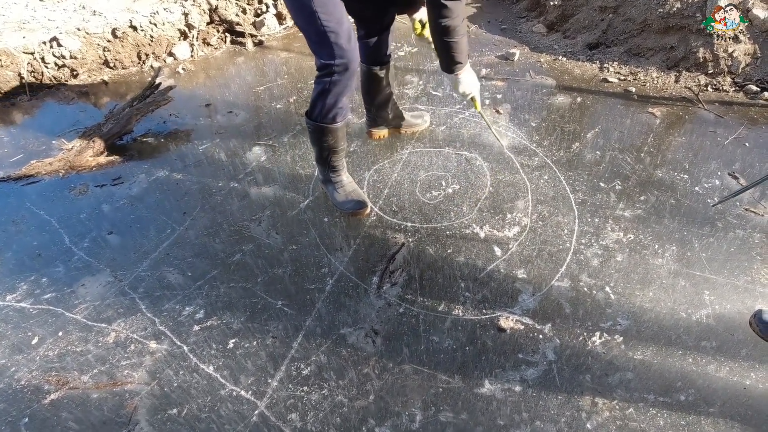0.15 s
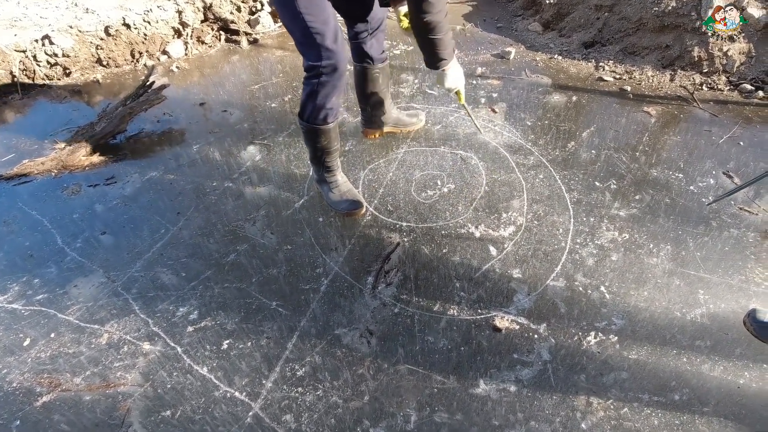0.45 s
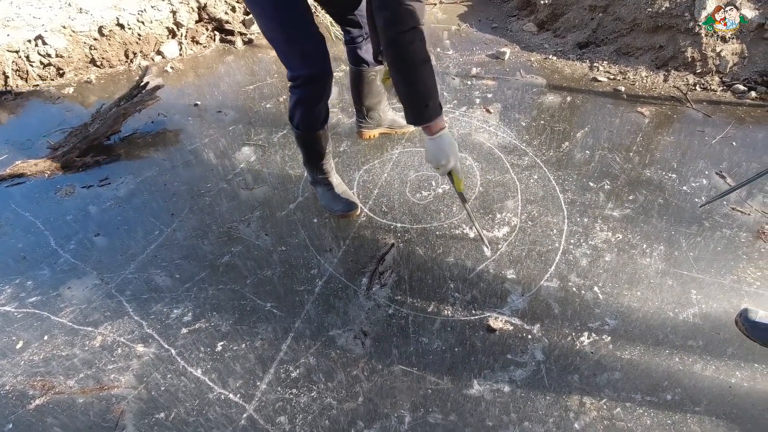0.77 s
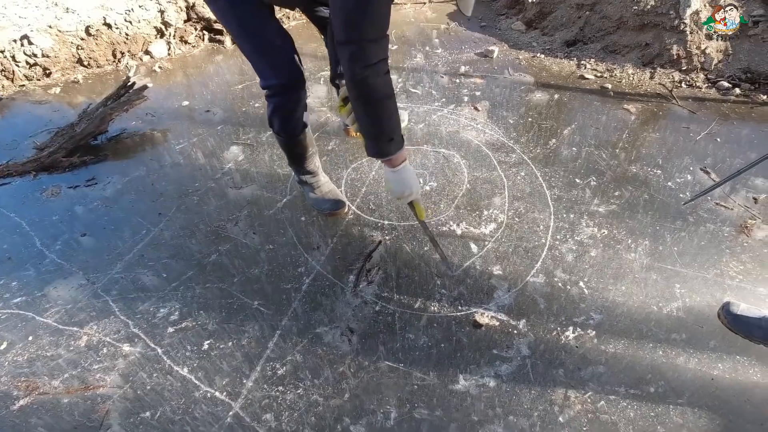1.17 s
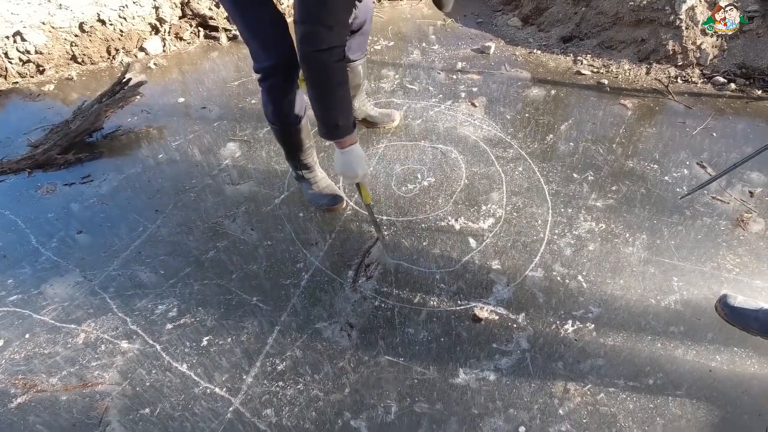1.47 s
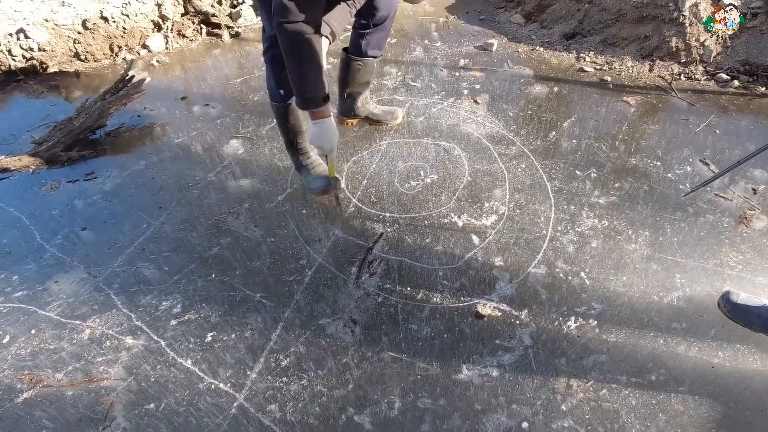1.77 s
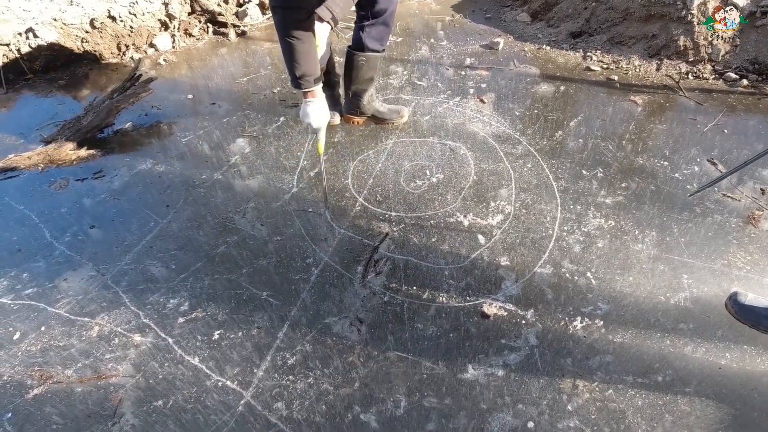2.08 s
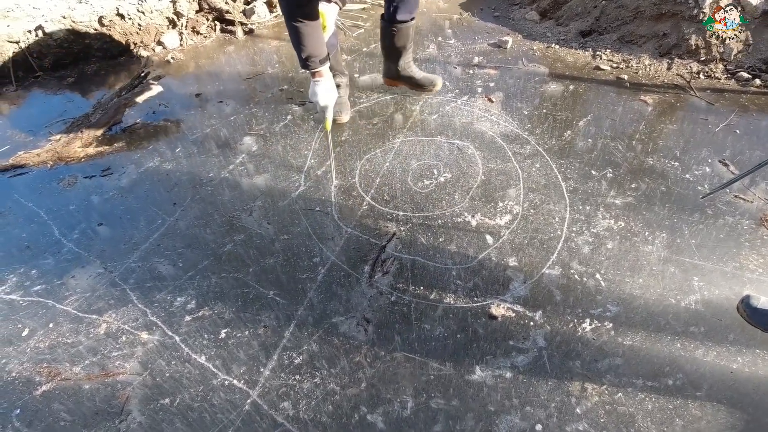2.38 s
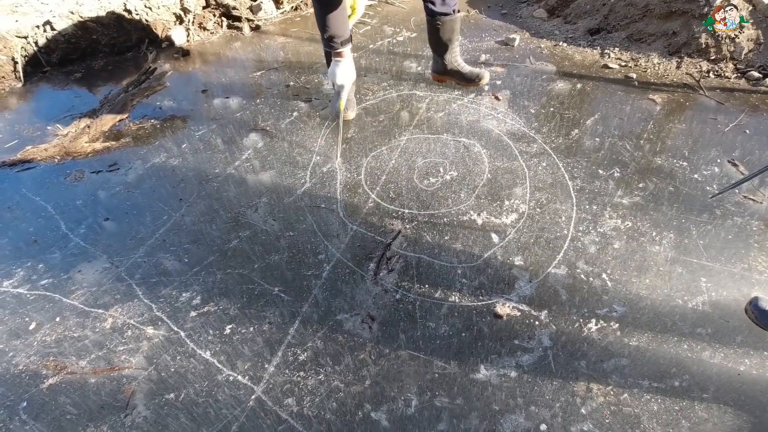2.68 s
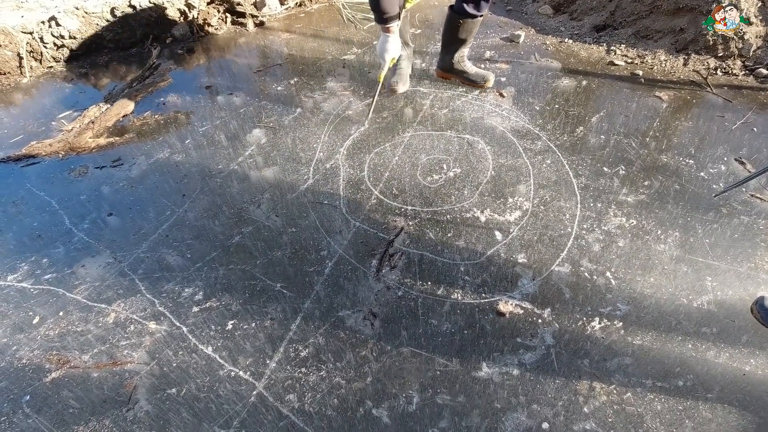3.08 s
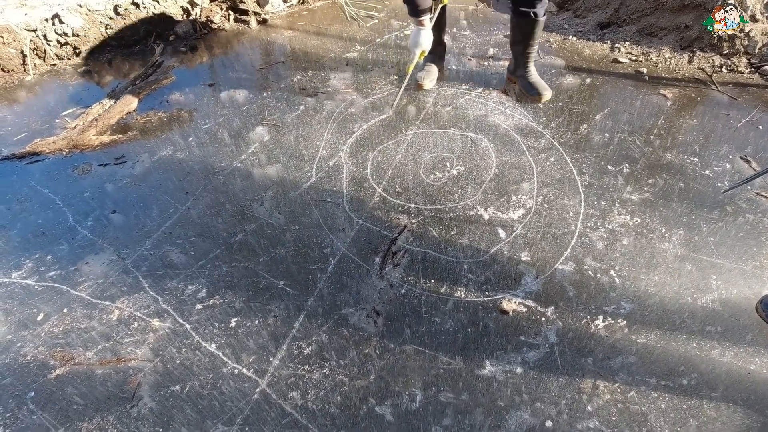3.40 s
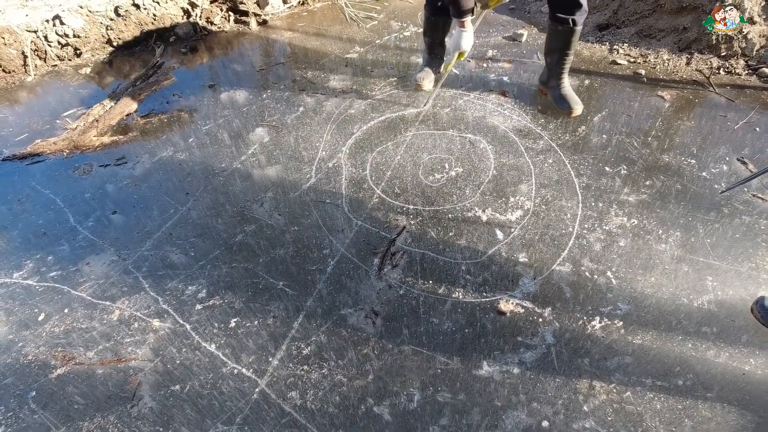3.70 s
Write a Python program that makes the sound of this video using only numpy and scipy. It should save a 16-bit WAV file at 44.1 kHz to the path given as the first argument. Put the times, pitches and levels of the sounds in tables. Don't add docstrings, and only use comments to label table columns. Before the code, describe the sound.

A metal rod tip scrapes harshly over thin pond ice, pauses, then rasps on much longer

```python
import sys
import numpy as np
from scipy import signal
from scipy.fft import rfft, irfft
from scipy.io import wavfile
from scipy.ndimage import uniform_filter1d, map_coordinates

SR = 44100
rng = np.random.default_rng(int(sys.argv[2]) if len(sys.argv) > 2 else 0)


def ratio_of_db(decibels):
    return 10 ** (np.asarray(decibels, float) / 20)


def dump(signal):
    limited = np.clip(np.atleast_2d(signal).T, -1, 1)
    pcm = np.round(limited * 32767).astype(np.int16)
    wavfile.write(sys.argv[1], SR, pcm)


N = 169785

# t/s, level/dB, brightness/dB, chatter depth [0-1]
STROKE_1 = [
    (0, -34, -3.5, 0.55),
    (0.12, -31, -4.5, 0.7),
    (0.28, -32, -5, 0.3),
    (0.36, -39, -1.5, 0),
    (0.462, -32.5, -1.5, 0.1),
    (0.497, -36, -8.5, 0.4),
    (0.515, -59, 3, 0.2),
]
STROKE_2 = [
    (1.279, -49, -1, 0.28),
    (1.298, -31.5, -6, 0.41),
    (1.42, -25.5, -2.5, 0.077),
    (1.56, -30.5, -4, 0.11),
    (1.71, -27, -3, 0.24),
    (1.735, -49.5, 4, 0.24),
]
STROKE_3 = [(1.787, -57, 3, 0.68), (1.816, -33, -4.5, 0.12), (1.9, -25.5, -4.5, 0.098),
            (2.07, -32.5, -9, 0.12), (2.25, -32, -7.5, 0.2), (2.35, -26.5, -8.5, 0.25),
            (2.6, -31.5, -4.5, 0.48), (2.719, -26.5, -8, 0.13), (2.92, -25.5, -8, 0.073),
            (3.04, -27.5, -9, 0.11), (3.16, -25.5, -7.5, 0.17), (3.27, -29.5, -9.5, 0.23),
            (3.46, -29, -8.5, 0.39), (3.66, -25.5, -3.5, 0.28), (3.85, -32, -1, 0.18)]
LIFT = [(.55, -62.5, -27, 0.55), (1.22, -42, -23, 0.32)]
# t/s, rate/(1/s)
SLIP_RATE_PER_S = [(.5, 140), (2.4, 85)]
# t/s, peak level/dB
CATCHES_EARLY = [(0.0079, -22), (0.024, -20.5), (0.0295, -30), (0.0406, -26), (0.045, -24), (0.0543, -30),
                 (0.0614, -24), (0.073, -21.5), (0.0813, -21), (0.0904, -19), (0.0983, -20.5),
                 (0.1076, -20.5), (0.117, -24), (0.1226, -22), (0.1284, -21.5), (0.135, -22), (0.141, -22),
                 (0.147, -23), (0.1534, -20.5), (0.1601, -20.5), (0.1673, -25), (0.1742, -23.5),
                 (0.1802, -17.5), (0.1905, -19), (0.2016, -20), (0.208, -25), (0.2162, -39.5),
                 (0.224, -20.5), (0.2383, -21.5), (0.2518, -18.5), (0.2562, -19), (0.2676, -14),
                 (0.281, -20), (0.288, -21), (0.2957, -22), (0.3013, -19.5), (0.3082, -23), (0.3153, -19.5),
                 (0.3251, -26.5), (0.3332, -26), (0.3436, -21.5), (0.3507, -24.5), (0.358, -22.5),
                 (0.3646, -23), (0.37, -33), (0.3779, -23.5), (0.388, -28), (0.398, -27.5), (0.4045, -28),
                 (0.411, -26), (0.4202, -29), (0.434, -28), (0.4414, -28), (0.448, -24.5), (0.454, -28.5),
                 (0.4605, -30), (0.477, -25.5), (0.485, -32)]
GRAZE = [(1.1304, -46.5)]
CATCHES_MIDDLE = [(1.2215, -39), (1.2338, -34.5), (1.2495, -32.5), (1.2592, -24.5), (1.306, -27),
                  (1.319, -26.5), (1.3424, -22), (1.3485, -21), (1.397, -19.5), (1.4442, -18),
                  (1.501, -21.5), (1.5264, -26), (1.5353, -21), (1.5542, -23.5), (1.584, -22),
                  (1.5947, -29), (1.601, -21), (1.609, -26.5), (1.6187, -24.5), (1.684, -26), (1.6967, -21),
                  (1.7181, -18.5), (1.878, -18.5), (2.1827, -30), (2.1939, -25.5), (2.2506, -28),
                  (2.2608, -29.5), (2.346, -20.5), (2.373, -29), (2.3935, -23.5), (2.409, -28),
                  (2.454, -28), (2.48, -27), (2.491, -22.5), (2.5193, -20), (2.5284, -24.5), (2.5382, -22),
                  (2.547, -24), (2.5656, -23), (2.5775, -23.5), (2.587, -33), (2.5973, -27),
                  (2.6122, -22.5), (2.625, -24), (2.6423, -28), (2.652, -23), (2.6682, -21.5),
                  (2.6823, -23.5)]
CATCHES_LATE = [(2.7385, -22), (2.9357, -19), (3.0147, -21), (3.023, -23.5), (3.1025, -18.5),
                (3.121, -20.5), (3.1302, -18.5), (3.2072, -21), (3.2167, -24), (3.2368, -20), (3.2526, -27),
                (3.275, -21), (3.29, -21), (3.3054, -21), (3.3354, -21), (3.3553, -21), (3.3795, -19),
                (3.3973, -21.5), (3.406, -15.5), (3.4196, -18), (3.4268, -20.5), (3.4416, -21),
                (3.4684, -26), (3.482, -19.5), (3.4966, -23), (3.5032, -17.5), (3.5248, -20.5),
                (3.5398, -20.5), (3.55, -23), (3.5632, -22), (3.5896, -24), (3.5973, -21.5), (3.611, -21),
                (3.6238, -20), (3.6382, -20.5), (3.6538, -18.5), (3.688, -19), (3.6956, -21.5),
                (3.7014, -19), (3.7134, -23.5), (3.7315, -25), (3.7485, -25), (3.7564, -22),
                (3.7656, -22.5), (3.7766, -25), (3.7872, -19.5), (3.8074, -22), (3.8205, -22.5),
                (3.83, -24.5), (3.8404, -24)]
# f/Hz, level/dB
CRUSH = [(530, -20.5), (900, -15.5), (1150, -10.5), (2690, -1.5), (3150, -5), (5410, -8), (7580, -13),
         (10900, 0), (16000, -11.5)]
# f/Hz, level/dB
CRUSH_APART = [(530, -48.5), (900, -11.5), (1320, -27), (1600, -14.5), (1950, -17), (2730, -3.5),
               (8150, -2.5), (10900, 5.5), (16000, -6.5)]
GRIPS_S = [.25, 1.399, 1.69, 1.92, 2.4, 2.95, 3.38, 3.7]
# f/Hz, level/dB
RODS = [
    [(1410, -4.5), (2050, -0.5), (3100, 3), (3930, 0), (6380, 9.5), (9900, 10.5)],
    [(1640, 1.5), (3150, -3.5), (3870, 0.5), (4930, -1.5), (6030, 2.5), (10100, 7)],
    [(1770, 2), (3040, 0), (3750, -29), (6440, -0.5), (11400, 3.5)],
    [(1170, -4.5), (2000, -4.5), (3950, 0), (6400, -11), (10900, -12)],
    [(1150, -24), (2540, -7), (3470, -2.5), (11000, 1.5)],
    [(1520, -2), (2100, -7.5), (2680, 4.5), (3800, -5.5), (5300, -0.5), (10900, -10)],
    [(1400, -2), (2800, 4), (4500, 0.5), (6500, -3), (10500, 5.5)],
    [(1740, 1), (3300, 0), (5500, 7.5), (6600, 2.5), (10250, 12.5)],
]
GLIDES_PER_S = [0.19, 0.05, 0.028, 0.1, 0.15, 0.16, 0.29, 0.25]
# f/Hz, level/dB
SHEET = [(53, -40), (90, 4.5), (243, -8.5), (322, 8), (869, -4), (1300, -4), (1690, -12), (2860, -120)]
# f/Hz, level/dB
AIR = [(53, -52), (90, -6), (175, -12.5), (363, -8.5), (528, -14), (906, -18.5), (1880, -28), (5000, -36),
       (13000, -58.5)]
# t/s, level/dB
WIND = [
    (0, -40),
    (.55, -42.5),
    (0.749, -51),
    (2.051, -59),
    (2.25, -44.5),
    (3.29, -45.5),
    (3.35, -37),
    (3.45, -52),
    (3.75, -57),
]
# f/Hz, level/dB
WIND_COLOUR = [(12, -34), (20, 6.5), (48, 8), (146, -20), (200, -26), (260, -62.5), (440, -120)]
# t/s, level/dB, f/Hz
BLIPS = [
    (0.608, -42, 727),
    (0.651, -31.5, 710),
    (0.742, -46.5, 940),
    (0.896, -48.5, 940),
    (1.072, -47, 665),
]
# t/s, level/dB, f/Hz, t60/s
THUMPS = [
    (2.107, -20.5, 350, 0.02),
    (2.226, -23, 60, 0.028),
    (2.739, -18.5, 101, 0.037),
    (3.3143, -8.5, 770, 0.0075),
    (3.494, -12, 141, 0.053),
]

GRIT_PER_S, GRIT_SPREAD_DB = 12000, 2.5
SLIP_S, SLIP_JITTER, SLIP_SPREAD_DB = 0.0039, 0.24, 1
CATCH_S, CATCH_DB = 0.0015, -0.5
STICK_S, STICK_DB = 0.0051, -4.5
APART_SAME, PORT_FLIP_HZ = 0.43, 2400
BRIGHT_REF_DB, BRIGHT_FROM_HZ, BRIGHT_FULL_HZ = 2.5, 5370, 8650
CRISP, PATCH_DB, SPECK_DB = .15, 1.37, 2.5
FAR_TOP_HZ, FAR_TOP_DB, FAR_SHEET_DB = 11500, -6, -6
RING_DB, FLICKER_DB, WAVER, RING_WIDTH_HZ, RING_LOSS = -15, 0.5, 0.017, 63.5, 0.035
SHEET_DB, SHEET_FOLLOW = -14, 0.45
BANK_T60_S, BANK_DB = .11, -19
AIR_DB, AIR_SAME = -54, 0.54
GUST_DB, WIND_SAME = 3.5, 0.18
BLIP_T60_S, BLIPS_PER_S, SMALL_BLIP_DB = 0.064, 140, -58.5
EDGE_HZ, CEILING = 16180, .6


def evened(x):
    return x / np.sqrt(np.mean(x ** 2) + 1e-20)


def read(points, hz):
    f, value_db = np.transpose(points)
    return np.interp(np.log(hz + 1), np.log(f + 1), value_db, -120, -120)


def coloured(x, points):
    gain = ratio_of_db(read(points, np.fft.rfftfreq(N, 1 / SR)))
    return evened(irfft(rfft(x) * gain, N))


def wander(per_s):
    knots = rng.standard_normal(int(N / SR * per_s) + 3)
    return evened(map_coordinates(knots, [np.arange(N) / SR * per_s], order=2))


def burst(width_s):
    t = np.arange(-400, 401) / SR
    spindle = np.exp(-(t / width_s) ** 2 / 2)
    tail = (t > 0) * np.exp(-abs(t) / .005) * (1 - np.exp(-(t / width_s) ** 2))
    return spindle + .15 * tail


def chatter(t):
    jitter = np.exp(SLIP_JITTER * wander(150) + 0.22 * wander(6))
    turns = np.cumsum(np.interp(t, *np.transpose(SLIP_RATE_PER_S)) * jitter) / SR
    slip_db = SLIP_SPREAD_DB * np.clip(rng.standard_normal(N), -3, 1.5)
    slips = (np.diff(np.floor(turns), prepend=0) > 0) * ratio_of_db(slip_db)
    return evened(signal.oaconvolve(slips, burst(SLIP_S), "same"))


def catches():
    hits = np.zeros(N)
    for s, db in CATCHES_EARLY + GRAZE + CATCHES_MIDDLE + CATCHES_LATE:
        hits[round(s * SR)] = ratio_of_db(db + CATCH_DB)
    hold = np.exp(-(np.arange(-800, 801) / SR / STICK_S) ** 2)
    stuck = np.minimum(signal.oaconvolve(1. * (hits > 0), hold, "same"), 1)
    return abs(signal.oaconvolve(hits, burst(CATCH_S), "same")), stuck


def contact():
    t = np.arange(N) / SR
    rows = np.array(STROKE_1 + LIFT + STROKE_2 + STROKE_3)
    level_db, bright_db, depth = (np.interp(t, rows[:, 0], rows[:, k]) for k in range(1, 4))
    level_db = np.where(abs(t - .89) < .329, -95, level_db)
    steady = 1 - np.clip(depth, 0, .97)
    force = ratio_of_db(level_db) * np.sqrt(steady ** 2 + (1 - steady ** 2) * chatter(t) ** 2)
    hard, stuck = catches()
    return np.maximum(force * ratio_of_db(STICK_DB * stuck), hard), bright_db


def ring(x, angle, width_hz):
    r, turn = np.exp(-np.pi * width_hz / SR), np.exp(1j * angle)
    smooth = signal.lfilter([np.sqrt(2 - 2 * r ** 2)], [1, -r], x * turn.conj())
    return (turn * smooth).real


def rod(drive, clock):
    out, waver = np.zeros(N), WAVER * wander(24.75)
    for k, rings in enumerate(RODS):
        share = np.sqrt(np.interp(clock, GRIPS_S, np.arange(len(RODS)) == k))
        on = share > 0
        pitch = 1 + GLIDES_PER_S[k] * (clock - GRIPS_S[k]) + waver
        angle = 2 * np.pi * np.cumsum(pitch[on]) / SR
        for f, db in rings:
            push = drive * share * ratio_of_db(db + RING_DB + FLICKER_DB * np.tanh(wander(30)))
            out[on] += ring(push[on], f * angle, RING_WIDTH_HZ + RING_LOSS * f)
    return out


def sheet(grit, force, clock):
    push = 0.035 * (uniform_filter1d(force, 600) / 0.027) ** SHEET_FOLLOW
    return ratio_of_db(SHEET_DB + FAR_SHEET_DB * (clock < 1)) * coloured(grit, SHEET) * push


def mottle(bins, frames, over_frames, over_bins):
    x = uniform_filter1d(rng.standard_normal((frames, bins)), over_frames, 0)
    return evened(uniform_filter1d(x, over_bins, 1)).T


def scrape():
    force, bright_db = contact()
    clock = np.arange(N) / SR
    size_db = GRIT_SPREAD_DB * np.minimum(rng.exponential(1, (2, N)), 4)
    size = (rng.random((2, N)) < GRIT_PER_S / SR) * ratio_of_db(size_db)
    grit = evened(size * rng.choice([-1., 1.], (2, N)))

    alike = coloured(grit[0], CRUSH) * force + rod(grit[0] * force, clock)
    apart = [coloured(g, CRUSH_APART) * force for g in grit]
    hz, t, z = signal.stft(np.array([alike, *apart]), SR, nperseg=128)
    flip = 1j * np.sign(np.cos(2 * np.pi * hz / PORT_FLIP_HZ))[:, None]
    z = np.array([z[0], flip * APART_SAME * z[1] + np.sqrt(1 - APART_SAME ** 2) * z[2]])

    lean = np.clip((hz - BRIGHT_FROM_HZ) / (BRIGHT_FULL_HZ - BRIGHT_FROM_HZ), 0, 1)[:, None]
    force_db = 20 * np.log10(force)
    bright_db = bright_db + CRISP * np.clip(force_db - uniform_filter1d(force_db, 2000), -10, 10)
    field_db = lean * (np.interp(t, clock, bright_db) - BRIGHT_REF_DB)
    field_db += PATCH_DB * mottle(len(hz), len(t), 50, 2)
    field_db += SPECK_DB * mottle(len(hz), len(t), 5, 5)
    field_db += FAR_TOP_DB * (hz > FAR_TOP_HZ)[:, None] * (t < 1.2)
    mid, side = signal.istft(z * ratio_of_db(field_db), SR, nperseg=128)[1][:, :N]
    mid = mid + sheet(grit[0], force, clock)
    return np.array([mid + side, mid - side])


def banks(x):
    t = np.arange(SR // 4) / SR
    both, apart = rng.standard_normal((2, len(t))) * ratio_of_db(-60 * t / BANK_T60_S) * (t > .004)
    apart = 0.2 * np.gradient(apart) + .1 * apart
    taps = np.array([both + apart, both - apart])
    return ratio_of_db(BANK_DB) * signal.oaconvolve(x, taps / np.linalg.norm(taps[0]), axes=1)[:, :N]


def spread(points, same):
    a, b = (coloured(v, points) for v in rng.standard_normal((2, N)))
    return np.array([a, same * a + np.sqrt(1 - same ** 2) * b])


def air():
    return ratio_of_db(AIR_DB) * spread(AIR, AIR_SAME)


def wind():
    level_db = np.interp(np.arange(N) / SR, *np.transpose(WIND))
    return spread(WIND_COLOUR, WIND_SAME) * ratio_of_db(level_db + GUST_DB * wander(11))


def knocks(rows, rise_s):
    out, t = np.zeros(N + SR), np.arange(SR // 4) / SR
    for s, db, hz, t60_s in rows:
        at = round(s * SR)
        envelope = ratio_of_db(db - 60 * t / t60_s) * np.minimum(t / rise_s, 1)
        out[at:at + len(t)] += envelope * np.sin(2 * np.pi * hz * t)
    return out[:N]


def blips():
    u = rng.random((round(BLIPS_PER_S * N / SR), 3))
    small = [(a * N / SR, SMALL_BLIP_DB + 10 * b, 300 + 800 * c, BLIP_T60_S) for a, b, c in u]
    return knocks([(*row, BLIP_T60_S) for row in BLIPS] + small, 0.0028)


def thumps():
    return knocks(THUMPS, 0.0019)


def scene():
    near = scrape() + blips() + thumps()
    return near + banks(near) + air() + wind()


def band_limit(x):
    return signal.sosfilt(signal.butter(12, 16510, fs=SR, output="sos"), x)


def record(dry):
    edge = signal.firwin(511, EDGE_HZ, window=("kaiser", 9), fs=SR)[None]
    limited = CEILING * np.tanh(dry / CEILING)
    return band_limit(signal.oaconvolve(limited, edge, "same"))


dry = scene()
out = record(dry)
dump(out)
```